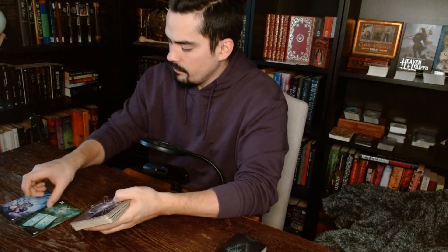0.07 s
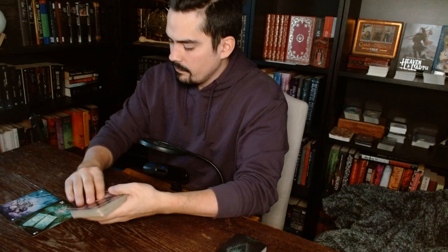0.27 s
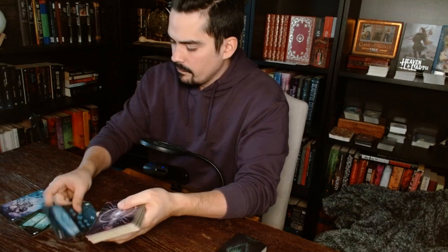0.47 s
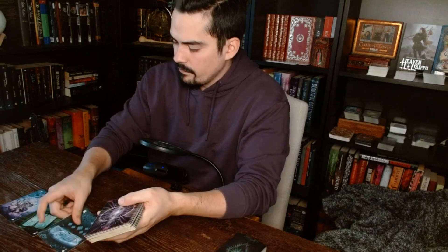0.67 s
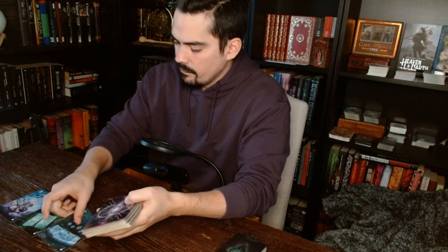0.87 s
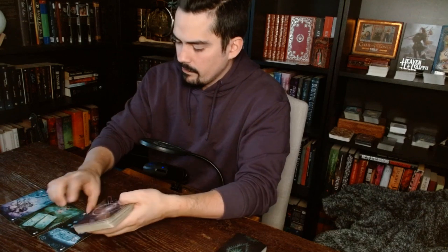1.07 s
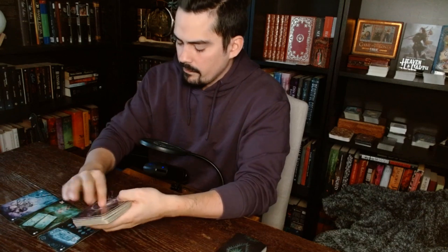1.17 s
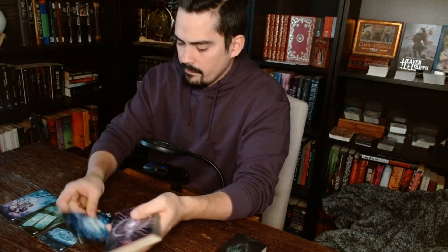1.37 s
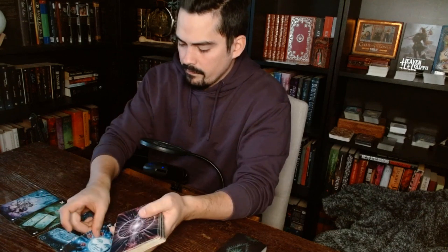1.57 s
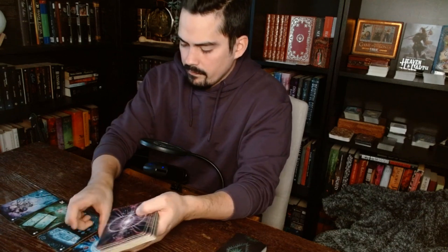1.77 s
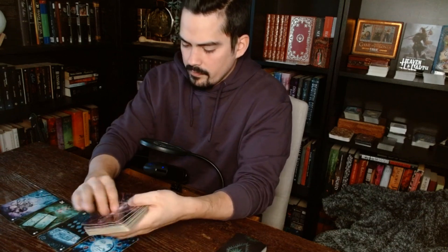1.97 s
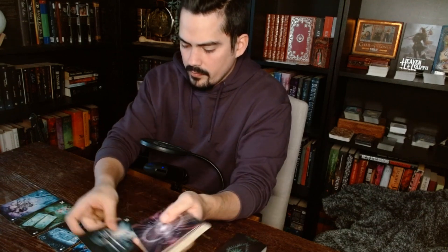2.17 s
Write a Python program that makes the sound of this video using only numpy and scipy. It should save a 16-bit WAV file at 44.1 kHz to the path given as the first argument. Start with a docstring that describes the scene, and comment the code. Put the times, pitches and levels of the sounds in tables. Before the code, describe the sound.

Cards slide off a deck and snap down one by one onto a wooden table

```python
"""In a small furnished room, a hand draws cards off a deck held just over a wooden table and snaps each one down,
close to the microphone. A draw is fingertip ticks and a papery slide (filtered noise), puffs of low air (short
cosine pulses) and a knock of the deck (decaying modes); one draw squeaks. A snap is noise cracks in the card's
modes and a ring of the tabletop. The table also hums at its lowest mode under the moving arms."""
import sys
import numpy as np
from scipy import signal
from scipy.fft import rfft, irfft, next_fast_len
from scipy.io import wavfile
from scipy.ndimage import uniform_filter1d

SR = 44100
rng = np.random.default_rng(int(sys.argv[2]) if len(sys.argv) > 2 else 0)


def makeup_ratio(level_db):
    """Linear amplitude ratio for a level in decibels (20 dB per factor of ten)."""
    decades = np.asarray(level_db, float) / 20
    return 10 ** decades


def persist_wave(psi):
    """Save psi, clipped to +-1, as 16-bit WAV."""
    counts = np.round(np.clip(psi, -1, 1) * 32767).astype(np.int16)
    wavfile.write(sys.argv[1], SR, np.atleast_2d(counts).T)


N = 98475

# tabletop modes: (frequency [Hz], relative level [dB], decay t60 [s])
TABLE_MODES = [(92.6, -2.5, 0.2), (142, -4, 0.082), (170.3, -5.5, 0.19), (205.7, 7.5, 0.22),
               (243.3, 3, 0.22), (332, 6.5, 0.043)]
# blows on the table: (time [s], fingertip level [dB], push length [ms], card's blow re fingertip's [dB])
TABLE_BLOWS = [(-.0035, -19, 3.34, -1.5), (0.9568, -24, 1.5, -5.5), (1.7388, -17.5, 3.55, -3.5)]
# card modes: (frequency [Hz], resonance width [Hz], relative level [dB])
CARD_MODES = [(3740, 730, -3), (5760, 820, -0.5), (7400, 1800, 1), (10600, 6000, -4.5)]
# cracks of a landing card, its rebounds, and the fingertip's ticks just after: # (time [s], level [dB], added
# level of lowest card mode [dB], body level re crack [dB])
CARD_CRACKS = [(0.9548, -32.5, 5, -11), (0.9572, -25.5, 0.5, -7.5), (0.9608, -38.5, -19, 2),
               (.9655, -43, 13.5, -7), (1.7402, -18, -8, -7), (1.7422, -23.5, -10, -9),
               (1.7485, -40, -6, -10), (1.7507, -38, 6, 0)]
# table hum under the arms: (time [s], level [dB])
HUM_LEVELS = [(0, -38), (.2, -49.5), (0.449, -37.5), (.6, -57), (.66, -57.5), (.9, -61), (1.0, -50),
              (1.15, -47), (1.4, -38.5), (1.55, -49.5), (1.7, -50), (1.85, -47.5), (2.0, -51), (2.1, -40),
              (2.233, -47)]
# spectrum of the room's steady air: (frequency [Hz], relative level [dB])
AIR_SPECTRUM = [(12, -35), (20, 25), (65, -8), (150, -15.5), (222, -15), (270, -25), (499, -34), (590, -33),
                (718, -38), (780, -39.5), (1860, -47.5), (4420, -49.5), (16000, -61)]
# reverberation time: (frequency [Hz], decay t60 [s])
ROOM_DECAY = [(300, .14), (1200, .17), (4000, .19), (8000, .16), (14000, .1)]
# card sliding on card or wood, one list a slide: (time [s], sheen level [dB], broad rub re sheen [dB])
SLIDE_LEVELS = [
    [(.27, -85.5, 16.5), (.315, -67.5, -3.5), (.335, -54.5, -2.5), (.364, -48, -16.5), (.373, -35, -18.5),
     (.384, -48, -7), (.4, -49.5, 3.5), (.418, -51.5, 5), (.428, -65.5, -7), (.508, -70, 0),
     (.514, -62.5, 8.5), (.54, -68.5, 8), (.58, -94, 21), (.608, -73, 4.5), (.65, -100, 0)],
    [(.7, -108, -10), (.74, -100, -8), (.8, -112, -2), (.855, -75, -18), (.895, -112, 0), (.908, -83, -3),
     (.93, -67.5, -29), (.954, -66, 6)],
    [(1.07, -97, 18), (1.094, -73, 1), (1.12, -83.5, 8.5), (1.215, -79, 8.5), (1.25, -64.5, 3),
     (1.295, -52, -10.5), (1.301, -41.5, -17), (1.315, -47.5, -13), (1.33, -53.5, 12.5), (1.352, -46.5, 1),
     (1.362, -77.5, 12), (1.43, -75.5, 11), (1.456, -59.5, 4.5), (1.478, -76.5, 15), (1.62, -78, 4.5)],
    [(1.69, -82, 0), (1.71, -67, -26), (1.737, -72.5, 10.5)],
    [(1.9, -86, 2), (2.0, -79, 4), (2.02, -67.5, 11.5), (2.068, -53.5, -5.5), (2.076, -43, -13.5),
     (2.1, -51.5, -5), (2.122, -51, 6.5), (2.146, -61, -1.5), (2.19, -74, 7.5), (2.233, -69, 1)],
]
# how far each slide's sheen is shifted: (shift [octaves])
SHEEN_SHIFTS = [-0.038, -0.49, 0.0054, -0.57, 0.012]
# sheen of the slide: (frequency before the shift [Hz], resonance width [Hz], relative level [dB])
SHEEN_PEAKS = [(5840, 1030, -1), (8000, 5300, 1.5), (13200, 1800, -11)]
# spectrum of the broad rub: (frequency [Hz], relative level [dB per Hz])
RUB_SPECTRUM = [(150, 3), (400, 3), (1000, -1.5), (2200, -5), (4000, -8), (8000, -32), (15000, -48)]
# ticks of nail and card edge: (time [s], peak level [dB], centre [Hz], fall time constant [ms])
EDGE_TICKS = [(0.2724, -41.5, 6430, 0.9), (0.289, -53, 7060, 0.77), (0.3135, -45.5, 5000, 1.1),
              (0.4171, -31.5, 4030, 0.6), (.5135, -49, 5130, 1.1), (.607, -59, 7100, .8),
              (1.09, -60, 8000, 3.6), (1.212, -34, 7200, 1.03), (1.236, -40, 6080, .9),
              (1.2555, -51, 4060, .7), (1.331, -27, 5130, 0.18), (1.3492, -40, 4550, 1.5),
              (1.441, -43, 7600, 1.1), (1.4705, -42, 7400, 1.1), (1.5145, -46.5, 7300, 1.1),
              (2.0073, -43.5, 6800, 1.14), (2.02, -33, 9100, 1), (2.035, -50, 6000, 0.69),
              (2.1229, -32, 4130, 0.58), (2.131, -46, 6070, 0.53)]
# deck modes: (frequency [Hz], relative level [dB], decay t60 [s])
DECK_MODES = [(243, -1, 0.042), (643, 5, 0.031), (779, 0.5, 0.028), (950, 4, 0.035), (1384, -4, 0.014)]
# knocks of the deck: (time [s], peak level [dB], push length [ms])
DECK_KNOCKS = [(0.4322, -28, 0.56), (0.4348, -22.5, 0.51), (.514, -46.5, 1.13), (1.089, -53, 1.9),
               (1.331, -28, 0.76), (1.3768, -20, 0.51), (1.3794, -30, 0.64), (2.124, -32, 0.62),
               (2.147, -33, 1.6)]
# squeak of a card edge: (level [dB], start frequency [Hz], end frequency [Hz], length [s])
EDGE_SQUEAK = (-46, 2000, 2750, .008)
# puffs of low air: (time [s], peak level [dB], frequency [Hz], 1 towards the microphone or -1 away)
AIR_PUFFS = [(0.275, -31.5, 131, -1), (0.284, -32, 61, 1), (0.319, -31.5, 52.3, 1), (0.339, -24, 50, 1),
             (0.404, -30, 47.3, -1), (.421, -25, 50, 1), (0.4341, -19.5, 159, -1), (0.514, -38, 107, -1),
             (0.9612, -25, 75, 1), (1.215, -28, 156, -1), (1.239, -33.5, 131, -1), (1.266, -28, 63, -1),
             (1.337, -22.5, 91.4, -1), (1.349, -20, 54.7, 1), (1.3763, -26, 150, -1),
             (1.403, -44, 35.3, -1), (2.009, -36.5, 163, -1), (2.022, -30, 125, -1), (2.035, -34, 59.3, 1),
             (2.046, -28, 57.5, -1), (2.088, -31, 31, -1), (2.131, -33, 76, -1), (2.193, -35.5, 31.8, -1)]

CRACK_RISE_S, CRACK_FALL_S = 0.00035, 0.0011  # time constants
FINGER_DELAY_S, TABLE_BLOOM_S = 0.006854, 0.0013  # the fingertip lands after the card; the ring swells in
HUM_HZ, HUM_WIDTH_HZ = 47, 10  # one resonance, applied twice
AIR_DB = -52.5
ROOM_DB, ROOM_DELAY_S, ROOM_TILT_DB_PER_OCT = -10, 0.0053, -1.5
GRAIN_DB, GRAINS_PER_S = 1.5, 14000  # mean of the uneven grain boosts, grain density
CATCH_DB, CATCH_PER_S = 1.5, 350  # depth and rate of catching and slipping
SQUEAK_S = 1.298
PUFF_CYCLES = 0.36  # from a puff's peak to where its envelope is 1/e
TOP_HZ = 16300


def unit(x):
    """Normalisation to unit root-mean-square."""
    return x / np.sqrt(np.mean(x ** 2))


def unit_peak(x):
    """Normalisation to unit peak."""
    return x / np.abs(x).max()


def shape(x, gain):
    """Linear filtering: the spectrum is multiplied by a gain that is a function of frequency."""
    size = next_fast_len(len(x) + 4096)
    hz = np.arange(size // 2 + 1) * SR / size + 0.00071  # never exactly zero
    return irfft(rfft(x, size) * gain(hz), size)[:len(x)]


def peak(hz, width_hz):
    """Resonance of a damped oscillator, gain 1 at the centre."""
    return lambda f: 1 / (1 + 1j * (f / hz - hz / f) * hz / width_hz)


def curve(points):
    """Spectral envelope: gain interpolated in dB over log frequency through (frequency [Hz], level [dB])."""
    hz, db = np.array(points, float).T
    return lambda f: makeup_ratio(np.interp(np.log(f), np.log(hz), db))


def add(out, at_s, sound):
    """Superposition: mix a sound in at a time, cutting what falls outside."""
    i = int(round(at_s * SR))
    part = sound[max(-i, 0):N - i]
    out[max(i, 0):max(i, 0) + len(part)] += part


def walk(rate):
    """Random modulation: levels held 1 / rate s, then slewed by a moving average."""
    hold = int(SR / rate)
    steps = np.repeat(rng.standard_normal(N // hold + 1), hold)
    return 1.2 * uniform_filter1d(steps, hold)[:N]


def ring(modes, push_ms, spread_db, bloom_s):
    """Modal excitation: a half-sine push rings decaying modes, their levels varied per blow; peak 1."""
    t = np.arange(int(.5 * SR)) / SR
    vary = spread_db * rng.standard_normal(len(modes))
    y = np.zeros(len(t))
    for (hz, db, t60), change in zip(modes, vary):
        decay = np.exp(-np.log(1000) * t / t60)
        y += makeup_ratio(db + change) * np.sin(2 * np.pi * hz * t) * decay
    push = np.sin(np.pi * np.clip(t[:400] * 1000 / push_ms, 0, 1))
    return unit_peak(np.convolve(y * (1 - np.exp(-t / bloom_s)), push)[:len(t)])


def burst(hz, width_hz, rise_s, fall_s):
    """Transient band noise: a short spit round a centre; peak 1."""
    t = np.arange(1500) / SR
    noise = shape(rng.standard_normal(len(t)), lambda f: peak(hz, width_hz)(f) ** 2)
    return unit_peak(noise * (1 - np.exp(-t / rise_s)) ** 2 * np.exp(-t / fall_s))


def thud(hz, width_hz):
    """Impulse response: one push through a broad resonance; peak 1."""
    impulse = 1. * (np.arange(1500) == 0)
    return unit_peak(shape(impulse, lambda f: peak(hz, width_hz)(f) ** 2))


def table_rings():
    """Modal ringing of a struck plate: the card's blow, then the fingertip's, on the tabletop."""
    out = np.zeros(N)
    for at, table_db, push_ms, card_db in TABLE_BLOWS:
        body = ring(TABLE_MODES, push_ms, 1.0, TABLE_BLOOM_S)
        add(out, at, -makeup_ratio(table_db + card_db) * body)
        add(out, at + FINGER_DELAY_S, -makeup_ratio(table_db) * body)
    return out


def background():
    """Resonance driven by noise: the table's hum on its level curve, over the room's steady air."""
    s, db = np.array(HUM_LEVELS, float).T
    hum = unit(shape(rng.standard_normal(N), lambda f: peak(HUM_HZ, HUM_WIDTH_HZ)(f) ** 2))
    hum = hum * makeup_ratio(np.interp(np.arange(N) / SR, s, db))
    low_cut = lambda f: f ** 2 / (f ** 2 + 60 ** 2)
    air = unit(shape(rng.standard_normal(N), lambda f: curve(AIR_SPECTRUM)(f) * low_cut(f)))
    return hum + air * makeup_ratio(AIR_DB + 1.0 * walk(5.5))


def room(x):
    """Diffuse reverberation: convolution with noise bands, each decaying at its own t60."""
    t = np.arange(int(.4 * SR)) / SR
    tail = np.zeros(len(t))
    decay_hz, decay_s = np.array(ROOM_DECAY).T
    for hz in 250 * 2. ** np.arange(7):
        t60 = np.interp(np.log(hz), np.log(decay_hz), decay_s)
        band = shape(rng.standard_normal(len(t)), lambda f: peak(hz, hz)(f) ** 2)
        tilt = makeup_ratio(ROOM_TILT_DB_PER_OCT * np.log2(hz / 4000))
        tail += band * tilt * np.exp(-np.log(1000) * t / t60)
    tail *= np.clip(t / ROOM_DELAY_S - .5, 0, 1)  # fades in from 0.5 to 1.5 delays
    return makeup_ratio(ROOM_DB) * signal.fftconvolve(x, tail / np.sqrt(np.sum(tail ** 2)))[:len(x)]


def grains():
    """Stick-slip friction: dense random grains of uneven size, catching and slipping."""
    hits = (rng.random(N) < GRAINS_PER_S / SR) * rng.standard_normal(N)
    uneven = makeup_ratio(GRAIN_DB * rng.exponential(size=N))
    return hits * uneven * makeup_ratio(CATCH_DB * walk(CATCH_PER_S))


def slides():
    """Friction noise: grains radiate through a bright resonant sheen and a broad rub."""
    t, out = np.arange(N) / SR, np.zeros(N)
    for rows, octaves in zip(SLIDE_LEVELS, SHEEN_SHIFTS):
        s, db, rub_db = np.array(rows, float).T
        colour = lambda f: sum(makeup_ratio(level) * np.abs(peak(hz * 2 ** octaves, width)(f)) ** 2
                               for hz, width, level in SHEEN_PEAKS)
        sheen = unit(shape(grains(), colour))
        rub = unit(shape(grains(), curve(RUB_SPECTRUM)))
        level = makeup_ratio(np.interp(t, s, db, -140, -140))
        out += level * (sheen + makeup_ratio(np.interp(t, s, rub_db)) * rub)
    return out


def ticks():
    """Impact transients: nail and card edge give short spits of band noise."""
    out = np.zeros(N)
    for at, db, hz, ms in EDGE_TICKS:
        add(out, at - .0004, makeup_ratio(db) * burst(hz, 1.8 * hz, .0001, ms / 1000))
    return out


def puffs():
    """Displaced air: a flicked card pushes about one cycle of low air at the microphone."""
    out = np.zeros(N)
    for at, db, hz, way in AIR_PUFFS:
        cycles = np.arange(-4000, 4000) / SR * hz
        pulse = np.cos(2 * np.pi * cycles) * np.exp(-(cycles / PUFF_CYCLES) ** 2)
        add(out, at - 4000 / SR, way * makeup_ratio(db) * pulse)
    return out


def knocks():
    """Modal ringing of a stack: short pushes set off the deck's decaying modes."""
    out = np.zeros(N)
    for at, db, push_ms in DECK_KNOCKS:
        add(out, at, makeup_ratio(db) * ring(DECK_MODES, push_ms, 2.0, .0001))
    return out


def crack(low_db):
    """Modal excitation by impact: spits of noise in the card's modes, the lowest raised by low_db."""
    out = np.zeros(1500)
    for k, (hz, width_hz, db) in enumerate(CARD_MODES):
        out += makeup_ratio(db + low_db * (k == 0)) * burst(hz, width_hz, CRACK_RISE_S, CRACK_FALL_S)
    return out / 2


def cracks():
    """Successive impacts: the card lands and rebounds, then the fingertip ticks; each a crack with a lower
    body."""
    out = np.zeros(N)
    for at, db, low_db, body_db in CARD_CRACKS:
        add(out, at, makeup_ratio(db) * (crack(low_db) + makeup_ratio(body_db) * thud(800, 1200)))
    return out


def squeak():
    """Frequency glide: a card edge gives a short rising tone, roughened by random modulation."""
    out = np.zeros(N)
    db, low_hz, high_hz, length_s = EDGE_SQUEAK
    part = np.linspace(0, 1, int(length_s * SR))
    phase = 2 * np.pi * np.cumsum(low_hz + (high_hz - low_hz) * part) / SR
    rough = 1 + 1.3 * walk(630)[:len(part)]
    add(out, SQUEAK_S, makeup_ratio(db) * np.sin(np.pi * part) * rough * np.sin(phase))
    return out


def scene():
    """Superposition of direct and reverberant sound, with table, puffs and background left dry."""
    # the first snap's crack falls before the start, so of that crack only the room tail sounds
    early = np.zeros(N)
    add(early, 0, makeup_ratio(-21.5) * thud(1200, 8500))
    near = slides() + ticks() + knocks() + cracks() + squeak()
    mix = near + room(near + early) + table_rings() + puffs() + background()
    return mix[None]


def band_limit(x):
    """A steep low-pass at the top of the band."""
    return signal.sosfilt(signal.butter(12, 16190, fs=SR, output="sos"), x)


def record(dry):
    """Band limiting: a steep low-pass cuts the top of the finished mix."""
    low_pass = signal.butter(6, TOP_HZ, fs=SR, output="sos")
    mix = signal.sosfilt(low_pass, dry)
    return band_limit(mix)


dry = scene()
out = record(dry)
persist_wave(out)
```